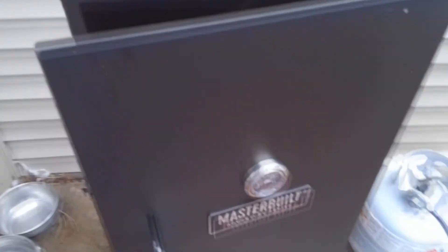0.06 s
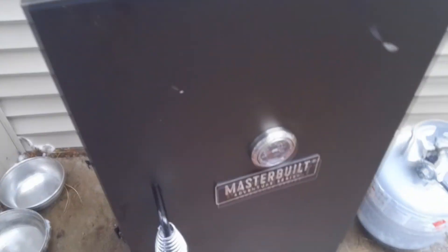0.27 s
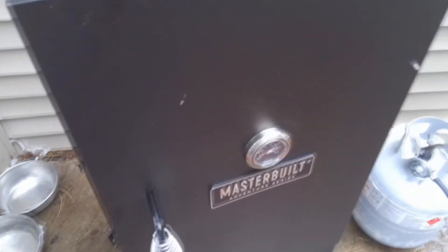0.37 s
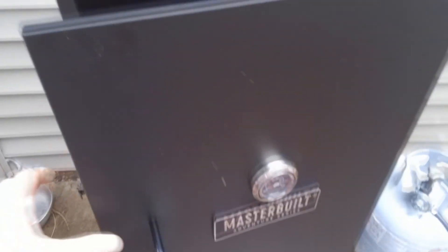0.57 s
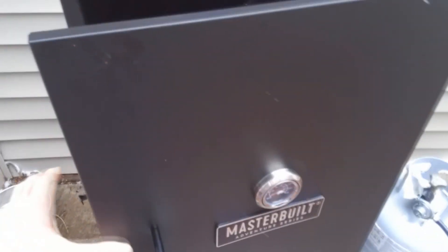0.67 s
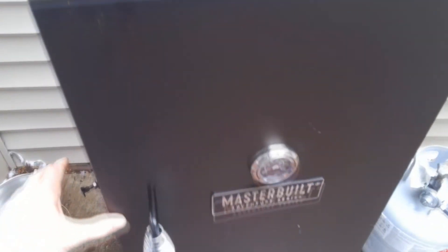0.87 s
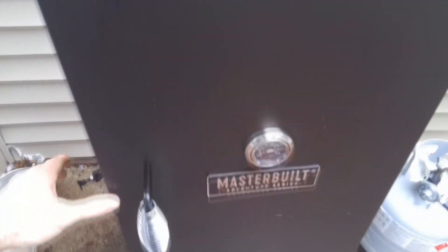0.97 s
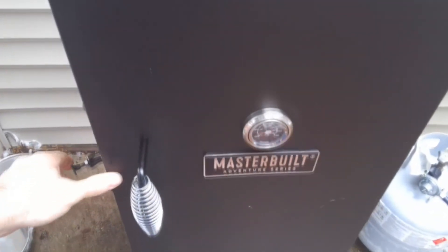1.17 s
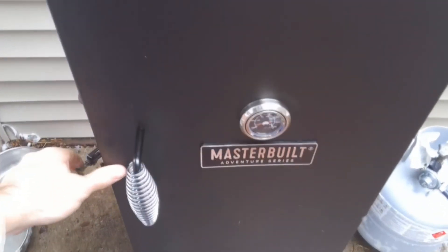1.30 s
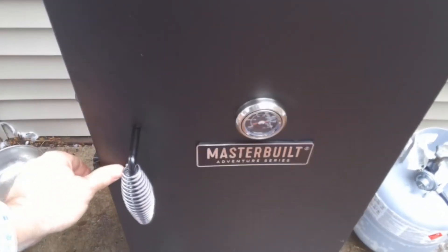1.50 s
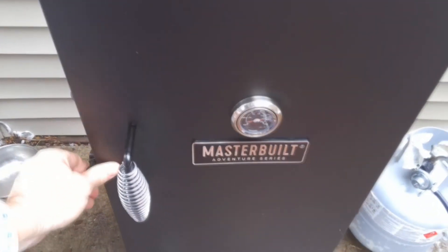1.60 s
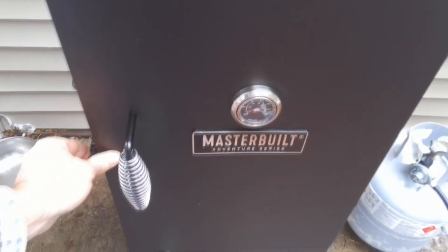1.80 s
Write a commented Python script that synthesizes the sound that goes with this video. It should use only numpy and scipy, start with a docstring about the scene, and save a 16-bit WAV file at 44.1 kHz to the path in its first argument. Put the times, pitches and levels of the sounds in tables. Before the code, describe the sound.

Close microphone outdoors: metal latch hardware snaps loudly, light ticks follow, then a thin steel door thuds shut, its coil handle rattling and edge scraping, while a soft burner flame hisses and a distant bird chirps.

```python
"""A gas burner roars and hisses softly outdoors, close by, in a steel cooker.
The latch hardware clicks as the door starts to swing; the door knocks shut and bounces twice.
Its coil handle jingles, its edge scrapes, small ticks sound and a distant bird calls faintly.
The flame, scrape and clang are shaped noise; the metal parts are sets of dying sines.
The bird is a set of falling tones blurred by slow noise."""
import sys
import numpy as np
from scipy import signal
from scipy.io import wavfile
from scipy.ndimage import uniform_filter1d

SR = 44100
rng = np.random.default_rng(int(sys.argv[2]) if len(sys.argv) > 2 else 0)


def output_pcm(signal):
    """Save a mono or channel-first signal as 16-bit PCM at the path in sys.argv[1].

    Samples are clipped to [-1, 1] before scaling.
    """
    pcm = np.clip(np.atleast_2d(signal).T, -1, 1) * 32767
    wavfile.write(sys.argv[1], SR, np.round(pcm).astype(np.int16))


N = 81585  # length in samples


def amp(db):
    """Turn decibels into a plain factor."""
    return 10 ** (np.asarray(db) / 20)


def evened(x):
    """Scale a signal to an average strength (RMS) of 1."""
    return x / np.sqrt(np.mean(x ** 2) + 1e-20)


def read(points, hz):
    """Read a value between the (frequency, value) points, along a logarithmic pitch axis."""
    f, value = np.transpose(points)
    return np.interp(np.log(hz + 1), np.log(f + 1), value)


def add(mix, s, sound):
    """Add a sound to the mix at s seconds, cut off at the end of the mix."""
    part = mix[max(round(s * SR), 0):][:len(sound)]
    part += sound[:len(part)]


def noise(spectrum, length, size, patch_db=0., flicker_db=0., t60=None):
    """Random short-time spectra of a given colour, with patches, flicker and an optional decay by band."""
    hop = size // 4
    hz = np.fft.rfftfreq(size, 1 / SR)
    frames = length // hop + 5
    real, imaginary, patches = rng.standard_normal((frames, len(hz), 3)).T
    # patches: level drifts over time and pitch; flicker: all pitches drift together
    patches = uniform_filter1d(patches, size=8, axis=0)
    patches = evened(uniform_filter1d(patches, size=10, axis=1))
    flicker = evened(uniform_filter1d(rng.standard_normal(frames), size=4))
    colour_db = read(spectrum, hz)
    db = colour_db[:, None] + patch_db * patches + flicker_db * flicker
    steady = np.sqrt(np.mean(amp(2 * colour_db)))
    if t60:
        frame_s = np.arange(frames) * hop / SR
        db = db - 60 * frame_s / read(t60, hz)[:, None]
    spectra = (real + 1j * imaginary) * amp(db) / steady
    sound = signal.istft(spectra, nperseg=size, noverlap=size - hop)[1]
    return sound[:length] / np.sqrt(size)


def ring(modes, level_db, centre_hz, spread, signs):
    """One blow: dying sines, favoured near the centre pitch that the contact excites."""
    hz, db, t60 = np.transpose(modes)[:, :, None]
    t = np.arange(int(.4 * SR)) / SR
    # a mode one spread (in octaves) away from the centre is 12 dB weaker
    weight_db = db - 12 * (np.log2(hz / centre_hz) / spread) ** 2
    sines = signs[:, None] * amp(weight_db - 60 * t / t60) * np.sin(2 * np.pi * hz * t)
    return amp(level_db) * sines.sum(0) / np.sqrt(amp(2 * weight_db).sum())


# Colour of the burner roar: (f/Hz, relative level/dB per Hz)
ROAR_COLOUR = [(15, 6), (25, -16), (54, -2), (97, -11), (202, -10.5), (356, -5), (401, -13), (430, -8.5),
               (565, -8), (824, -1.5), (1010, -16), (1500, -46), (1950, -26), (2500, -72)]
# Colour of the gas hiss: (f/Hz, relative level/dB per Hz)
HISS_COLOUR = [(590, -32), (1000, -4.5), (1860, -1), (2290, -2), (4450, -5.5), (4880, -6), (5290, -7.5),
               (12400, -8), (15600, -6.5)]
# Strength of the flame over time: (t/s, roar level/dB, hiss level/dB)
FLAME_LEVELS = [(0, -46, -48.5), (.19, -45.5, -50), (.36, -48, -50), (.54, -48.5, -54), (1.04, -50, -56),
                (1.09, -51, -58), (1.14, -51.5, -54.5), (1.35, -49, -56), (1.65, -47, -57),
                (1.85, -49.5, -59)]
# Soft puffs of wide hiss: (start t/s, length/s, top level/dB)
GAS_PUFFS = [(0.503, 0.035, -48.5), (1.116, 0.089, -54.5)]
ROAR_PATCH_DB = 1.5
HISS_PATCH_DB, HISS_FLICKER_DB = .4, .5


def burner():
    """Low roar of the flame and hiss of the gas, both shaped noise, with two soft puffs of hiss."""
    s, roar_db, hiss_db = np.transpose(FLAME_LEVELS)
    t = np.arange(N) / SR
    roar = evened(noise(ROAR_COLOUR, N, size=2048, patch_db=ROAR_PATCH_DB))
    colour = [(500, -62)] + HISS_COLOUR  # almost no hiss at 500 Hz and below
    hiss = evened(noise(colour, N, size=512, patch_db=HISS_PATCH_DB, flicker_db=HISS_FLICKER_DB))
    puff_level = np.zeros(N)
    for start, length, db in GAS_PUFFS:
        progress = np.clip((t - start) / length, 0, 1)
        puff_level += amp(db) * np.sin(np.pi * progress ** 0.45)  # rises faster than it falls
    puffs = puff_level * evened(noise(colour, N, size=512))
    return amp(np.interp(t, s, roar_db)) * roar + amp(np.interp(t, s, hiss_db)) * hiss + puffs


# Bird notes: (start t/s, length/s, from f/Hz, to f/Hz, level/dB)
BIRD_NOTES = [(1.085, .045, 4250, 3950, -62), (1.125, .085, 3300, 2950, -58), (.685, .025, 4800, 4750, -65),
              (.752, .012, 4400, 4300, -63), (1.83, .04, 4600, 4400, -62)]
BIRD_WIDTH_HZ = 350  # sets how quickly the blurring noise changes


def bird():
    """Far, smeared whistles: a falling tone blurred by slow noise."""
    out = np.zeros(N)
    for s, length, from_hz, to_hz, db in BIRD_NOTES:
        t = np.arange(0, length, 1 / SR)
        turns = np.cumsum(from_hz + (to_hz - from_hz) * t / length) / SR
        slow = uniform_filter1d(rng.standard_normal((2, SR // 4)), int(SR / BIRD_WIDTH_HZ))
        a, b = evened(slow)[:, :len(t)]
        whistle = ((a + 1j * b) * np.exp(2j * np.pi * turns)).real
        add(out, s, amp(db) * np.sin(np.pi * t / length) ** .5 * whistle)
    return out


# Small ticks: (t/s, level/dB before TICK_DB is added)
TICK_TIMES = [(0.427, -40), (0.4495, -44), (0.4744, -45), (0.499, -41), (0.521, -42), (0.5452, -39.5),
              (0.586, -40.5), (0.626, -56)]
TICK_HZ, TICK_S, TICK_DB = 2750, 0.0068, -7  # pitch, length, level change for all ticks


def ticks():
    """Tiny pitched ticks: short swells of one sine, further apart near the end, the last one faintest."""
    out = np.zeros(N)
    t = np.arange(0, TICK_S, 1 / SR)
    tick = np.sin(np.pi * t / TICK_S) ** 2 * np.sin(2 * np.pi * TICK_HZ * t)
    for s, db in TICK_TIMES:
        add(out, s, amp(db + TICK_DB) * tick)
    return out


# The door edge scrapes into its frame: (t/s, level/dB)
SCRAPE_LEVELS = [(1.385, -59), (1.42, -51), (1.47, -51.5), (1.51, -52), (1.56, -48), (1.622, -54.5),
                 (1.671, -78)]
# Colour of the scrape: (f/Hz, relative level/dB per Hz)
SCRAPE_SPECTRUM = [(300, 3), (1000, -1), (2500, -1), (4000, -7), (6000, -11.5), (15000, -21.5)]


def scrape():
    """Patchy friction noise while the door settles."""
    s, db = np.transpose(SCRAPE_LEVELS)
    level = amp(np.interp(np.arange(N) / SR, s, db, left=-120, right=-120))
    return level * evened(noise(SCRAPE_SPECTRUM, N, size=256, patch_db=1.2, flicker_db=1.2))


# Jolts of the coil handle: (t/s, level/dB, centre f/Hz, spread/octaves, time for chatter to fall 20 dB/s)
HANDLE_JOLTS = [(1.4143, -35.5, 5400, 1.6, 0.068), (1.419, -37, 9000, 0.37, 0.066),
                (1.461, -37, 11800, 0.45, 0.047), (1.5237, -37, 12600, 0.18, 0.047),
                (1.4613, -36, 3600, 0.61, 0.021), (1.542, -39.5, 4050, 0.88, 0.037),
                (1.547, -39.5, 11500, 0.55, 0.026)]
# Modes (own tones) of the coil handle: (f/Hz, relative level/dB, time to fall 60 dB/s)
COIL_MODES = [(3330, -3, .02), (3910, -4, .02), (5380, -9, .06), (7150, -8, .025), (7470, -3, .045),
              (8150, -9, .025), (10300, -8, .02), (10800, -1, .03), (12250, 0, .03), (12700, -4, .03),
              (13000, -6, .03), (13400, -6, .03), (14300, -6, .03)]
CHATTER_PER_S = 2100  # average number of touches per second
JOLT_SCUFF_DB, JOLT_SCUFF_T60 = -15.5, 0.063  # level relative to the jolt, seconds to fall 60 dB


def handle():
    """Coils chatter against each other: a scuff of noise and thin, grainy high rings."""
    out = np.zeros(N)
    t = np.arange(SR // 8) / SR
    for s, db, hz, spread, chatter_s in HANDLE_JOLTS:
        chance, strength = rng.random((2, len(t)))
        touches = (chance < CHATTER_PER_S / SR) * (2 * strength - 1) * amp(-20 * t / chatter_s)
        rings = ring(COIL_MODES, db, hz, spread, rng.choice([-1., 1.], len(COIL_MODES)))
        add(out, s, signal.fftconvolve(rings, touches / np.linalg.norm(touches)))
        scuff = amp(db + JOLT_SCUFF_DB - 60 * t / JOLT_SCUFF_T60) * rng.standard_normal(len(t))
        add(out, s, scuff)
    return out


def struck(modes, t):
    """Answer of a set of modes to one sharp tap: dying sines."""
    hz, db, t60 = np.transpose(modes)[:, :, None]
    return (amp(db - 60 * t / t60) * np.sin(2 * np.pi * hz * t)).sum(0)


GLIDE = 0.6  # contact pitch falls from 1 + GLIDE to 1 - GLIDE times its middle value
CRACK_T60, CRACK_WIDE_DB = .011, -20  # seconds to fall 60 dB, level of the unringing part of the crack


def clicks(events, modes, high_modes):
    """A brief springy contact drives the modes; a crack of noise, of its own level, drives the high ones."""
    out = np.zeros(N)
    t = np.arange(SR // 10) / SR
    body, high = struck(modes, t), struck(high_modes, t)
    for s, peak_db, contact_hz, contact_s, crack_db in events:
        progress = t[t < contact_s] / contact_s
        turns = np.cumsum(contact_hz * (1 + GLIDE * (1 - 2 * progress))) / SR
        contact = np.sin(np.pi * progress) ** 2 * np.sin(2 * np.pi * turns)
        click = np.convolve(body, contact)[:len(t)]
        fade = amp(crack_db - 60 * t / CRACK_T60) * np.minimum(t / .001, 1)  # 1 ms rise
        grit = fade * rng.standard_normal(len(t))
        crack = signal.fftconvolve(grit, high / np.linalg.norm(high))[:len(t)]
        crack = crack + amp(CRACK_WIDE_DB) * grit
        add(out, s, amp(peak_db) * click / abs(click).max() + crack)
    return out


# Latch clicks: (t/s, peak level without crack/dB, middle contact f/Hz, contact time/s, crack level/dB)
LATCH_CLICKS = [(.001, -32, 1600, 0.0012, -40), (0.1555, -22, 2050, 0.0013, -58),
                (0.3684, -2.5, 2320, 0.0025, -23), (0.4017, -18.5, 2140, 0.0021, -44),
                (0.469, -31.5, 1760, 0.00208, -64), (.546, -44, 1520, 0.0018, -75),
                (.905, -46, 1270, 0.0019, -62)]
# Modes of the latch hardware: (f/Hz, relative level/dB, time to fall 60 dB/s)
LATCH_MODES = [(830, 15.5, 0.038), (1180, 4.5, 0.034), (1304, 5.5, 0.05), (1377, 9.5, 0.045),
               (1584, -4.5, 0.059), (1690, -1.5, 0.036), (2020, -2, 0.031), (2200, 1.5, 0.025),
               (2385, 0.5, 0.016), (2557, 2.5, 0.047), (2800, 7, 0.018), (2870, 4.5, 0.0233),
               (3170, -11, 0.044)]
# Broad high resonances of the latch, rung by the crack: same columns (f/Hz, level/dB, time/s)
LATCH_HIGH_MODES = [(4515, -10, .019), (5500, -11, .006), (6200, -12, .008)]
# Clicks of the catch slipping free:
# (t/s, peak level without crack/dB, middle contact f/Hz, contact time/s, crack level/dB)
CATCH_SLIPS = [(0.2048, -25.5, 3100, 0.00092, -27.5), (.2072, -20.5, 1890, 0.0009, -53),
               (.2095, -33.5, 1040, 0.0013, -63), (0.2437, -10.5, 1704, 0.00209, -60),
               (0.2513, -13, 2510, 0.00163, -20)]
# Modes of the catch: (f/Hz, relative level/dB, time to fall 60 dB/s)
CATCH_MODES = [(745, 5, .07), (890, -2, .05), (1236, -2, .043), (1382, -6, .05), (1620, -8, .04),
               (1770, 0, .03), (1885, 0, .03), (2150, -4, .02), (2730, 6, .014), (3300, -3, .012)]
# High modes of the catch, rung by the crack: same columns (f/Hz, level/dB, time/s)
CATCH_HIGH_MODES = [(4450, -18, .012), (5150, -10, .011), (5860, -15, .012), (6330, -9, .013),
                    (6640, -15, .01), (7300, -17, .009)]


def latch():
    """The latch and its catch click, each with its own ring."""
    latch_sound = clicks(LATCH_CLICKS, LATCH_MODES, LATCH_HIGH_MODES)
    return latch_sound + clicks(CATCH_SLIPS, CATCH_MODES, CATCH_HIGH_MODES)


# Blows that reach the door panel:
# (t/s, boom level/dB, boom centre f/Hz, spread/octaves, clang level/dB, clang centre f/Hz)
DOOR_BLOWS = [(.2445, -31, 337, 1.24, -36, 604), (.266, -45, 500, 1.46, -31, 1020),
              (0.371, -41, 398, 1.4, -28.5, 1480), (1.3803, -13, 560, 1.9, -22.5, 680),
              (1.412, -35, 298, 1, -27.5, 1130), (1.459, -40, 204, 0.93, -37, 1550),
              (1.5726, -30, 1823, 1.08, -29, 1710), (1.6912, -34, 1810, 1.03, -30.5, 1780)]
# Modes of the door panel: (f/Hz, relative level/dB, time to fall 60 dB/s)
PANEL_MODES = [(75, 11, .1), (86, 7, 0.5), (168, -7, 0.3), (286, -7, 0.13), (396, -6.5, .18),
               (484, -4, 0.09), (508, -6, .09), (642.8, -3, .14), (795, 2, 0.105), (854, -7, 0.15),
               (916, -6, .07), (1090, -14, 0.069), (1200, -13, 0.056), (1500, -11, 0.043),
               (1640, -10, 0.074), (1840, -14.5, 0.1), (2105, -14, 0.081), (2584, -16.5, 0.097),
               (3340, -12.5, 0.086), (4400, -13, .1)]
# Countless small sheet modes, as a noise colour: (f/Hz, relative level/dB per Hz)
CLANG_COLOUR = [(60, 12), (300, 3), (775, -1.5), (2320, -21.5), (4540, -18), (6840, -19), (13400, -3),
                (15500, -46)]
# How long the clang lasts at each pitch: (f/Hz, time to fall 60 dB/s)
CLANG_DECAY = [(100, 0.9), (500, 0.12), (2000, 0.24), (6000, 0.1), (12000, 0.091)]
BLOW_RISE_S = 0.00087
CLANG_FALL_DB = 3  # per squared octave from the centre of the clang


def door():
    """Each blow rings the panel modes, with a dense clang of noise that decays at its own pace by pitch."""
    out = np.zeros(N)
    for s, db, hz, spread, clang_db, clang_hz in DOOR_BLOWS:
        boom = ring(PANEL_MODES, db, hz, spread, np.ones(len(PANEL_MODES)))
        t = np.arange(len(boom)) / SR
        rise = np.sin(np.pi / 2 * np.minimum(t / BLOW_RISE_S, 1)) ** 2
        add(out, s, boom * rise)
        colour = [(f, g - CLANG_FALL_DB * np.log2(f / clang_hz) ** 2) for f, g in CLANG_COLOUR]
        clang = noise(colour, SR // 3, size=256, t60=CLANG_DECAY)
        add(out, s, amp(clang_db) * clang * rise[:SR // 3])
    return out


def scene():
    """Everything reaches one microphone."""
    return (burner() + bird() + ticks() + scrape() + handle() + latch() + door())[None]


ROLL_HZ, EDGE_HZ = 14800, 15750  # gentle treble roll-off, steep band limit


def record(dry):
    """The microphone softens the very top; then the recorder limits the band."""
    gentle = signal.firwin(numtaps=31, cutoff=ROLL_HZ, fs=SR)
    steep = signal.firwin(511, EDGE_HZ, window=("kaiser", 9), fs=SR)
    soft = signal.oaconvolve(dry, gentle[None], "same")
    return signal.oaconvolve(soft, steep[None], "same")


dry = scene()
out = record(dry)
output_pcm(out)
```